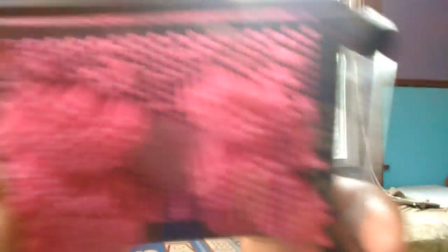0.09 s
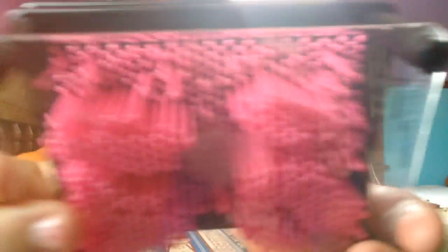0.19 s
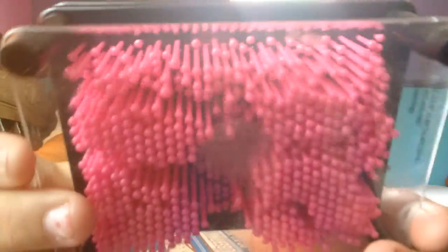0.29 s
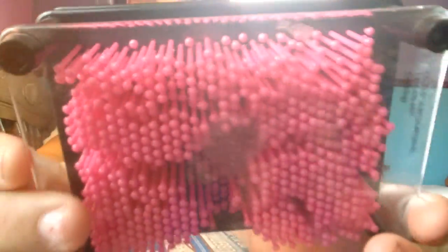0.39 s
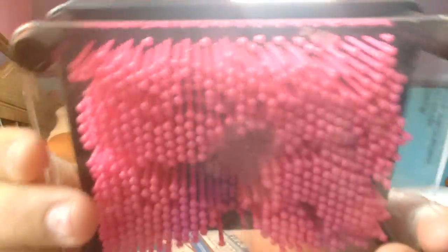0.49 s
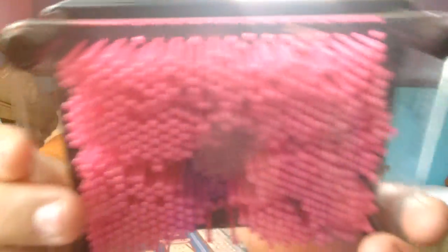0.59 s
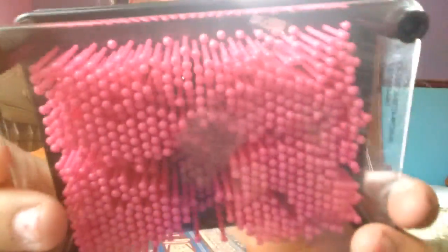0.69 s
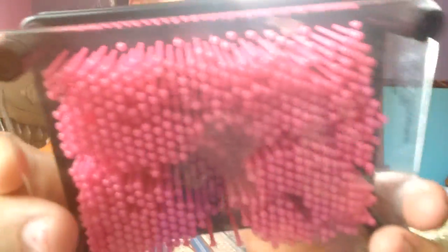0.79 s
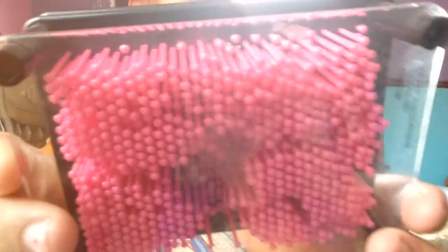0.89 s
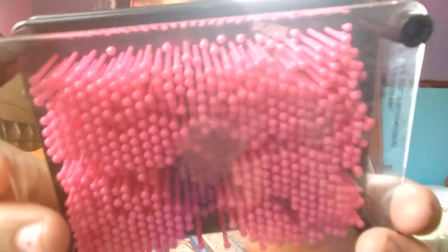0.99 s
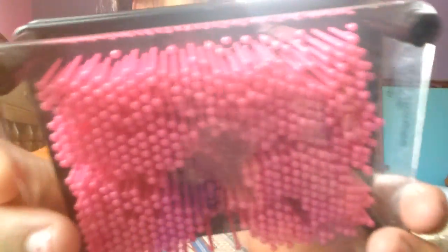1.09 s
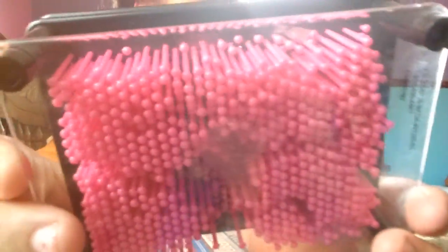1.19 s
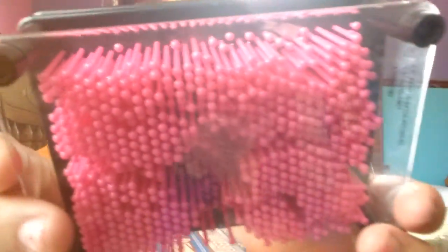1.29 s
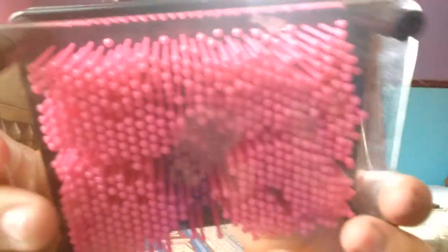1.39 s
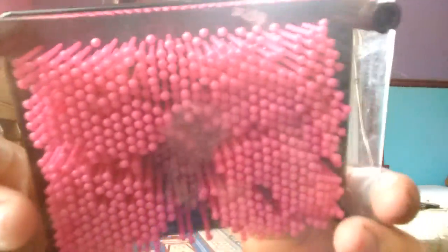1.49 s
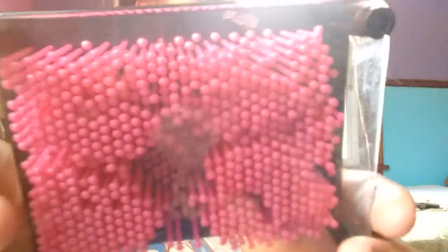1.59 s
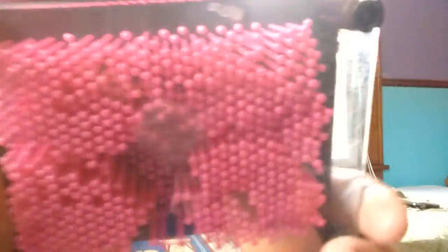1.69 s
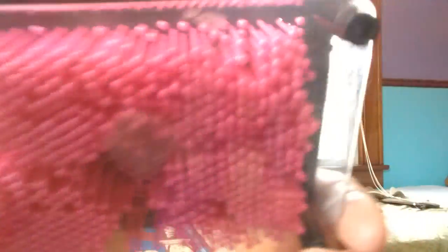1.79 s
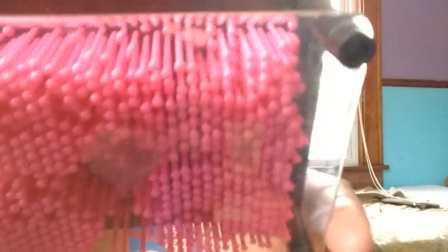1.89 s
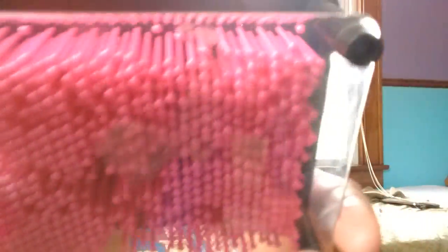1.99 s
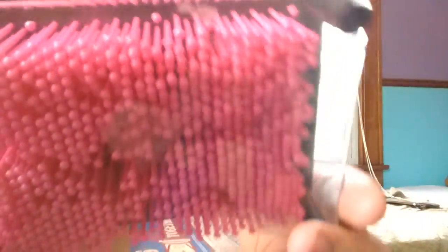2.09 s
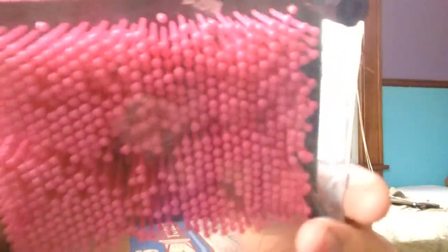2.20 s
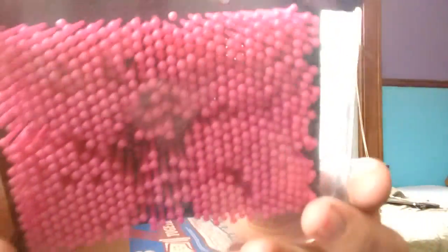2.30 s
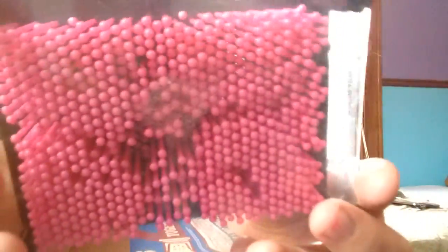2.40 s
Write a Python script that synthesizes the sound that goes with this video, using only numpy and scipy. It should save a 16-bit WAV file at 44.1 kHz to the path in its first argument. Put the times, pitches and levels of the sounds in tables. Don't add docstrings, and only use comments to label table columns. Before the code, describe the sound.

Loose plastic pins of a pin toy clatter in two quick bursts, sparse ticks between, close up

```python
import sys
import numpy as np
from scipy import signal
from scipy.fft import rfft, irfft
from scipy.io import wavfile

SR = 44100
rng = np.random.default_rng(int(sys.argv[2]) if len(sys.argv) > 2 else 0)


def store_pcm(level_fs):
    pcm = np.round(np.clip(level_fs, -1, 1) * 32767).astype(np.int16)
    wavfile.write(sys.argv[1], SR, np.atleast_2d(pcm).T)


def convert_level_to_amplitude(level_db):
    exponent = np.asarray(level_db, float) / 20
    return 10 ** exponent


N = 105840


def sharpen(hz, width):
    r = np.exp(-np.pi * width / SR)
    return r, [1, -2 * r * np.cos(2 * np.pi * hz / SR), r * r]


def resonate(x, peaks):
    click = np.arange(SR // 20) == 0
    out, unit = 0, 0
    for k, (hz, width, db) in enumerate(peaks):
        _, a = sharpen(hz, width)
        b = (-1) ** k * convert_level_to_amplitude(db) * np.array([1, 0, -1])
        out = out + signal.lfilter(b, a, x + 1e-18)
        unit = unit + signal.lfilter(b, a, click)
    return out / np.abs(unit).max()


def smooth(x, order, edge_hz, kind="low"):
    return signal.sosfilt(signal.butter(order, edge_hz, kind, fs=SR, output="sos"), x)


# start [s], port ring peak [dB], plate knock relative to it [dB].
FIRST_TILT = [(0.2402, -8, -7), (0.2423, -4, -12.5), (0.2457, -3, -12), (0.2467, -4.5, -7.5),
              (0.25, -7.5, -13.5), (0.251, -3.5, -13), (0.2543, -17, -9.5), (0.2568, -14.5, -7.5),
              (0.262, -15.5, -9), (0.2621, -10.5, -5), (0.2634, -16, -6.5), (0.2661, -8, -8),
              (0.268, -8, -9.5), (0.269, -16.5, -12.5), (0.272, -17, -10), (0.274, -15, -16),
              (0.276, -18, -6), (0.279, -20, -8.5), (0.282, -29, -9), (0.285, -8, -13), (0.291, -0.5, -19),
              (0.2922, -10.5, -8), (0.2948, -4, -18.5), (0.2987, -12.5, -9.0), (0.3016, -17, -14.5),
              (0.3031, -7.5, -12.5), (0.3082, -14.5, -17.5), (0.313, -21, -12), (0.3165, -10.5, -12.5),
              (0.3193, -20.5, -7.5), (0.3225, -7, -13.5), (0.3279, -26, -11.5), (0.33, -16, -13.5),
              (0.3316, -16.5, -14), (0.3343, -17, -9), (0.3359, -12.9, -13), (0.3382, -27.5, -7.5),
              (0.3437, -26, -11),
              (0.108, -30.5, -4), (0.1488, -30.5, -5), (0.152, -23, -10), (0.1543, -27, -13.5),
          (0.1664, -37.5, -15.5), (0.175, -37, -1), (0.1856, -34.5, -19.5), (0.1936, -21.5, -8),
          (0.196, -13, -17.5), (0.3474, -28, -13), (0.3507, -34, -2.5), (0.3555, -17, -11.5),
          (0.3582, -19.5, -1.3), (0.3576, -22.5, -0.5), (0.362, -8, -8.5), (0.3654, -29.5, -14.5),
          (0.3656, -30.5, -9.5), (0.3699, -32.5, -4), (0.3748, -8.5, -23.5), (0.3769, -13, -9),
          (0.3797, -3.5, -15), (0.3811, -2.5, -16.8), (0.3827, -10.5, -17.5), (0.385, -11.5, -9),
          (0.3873, -5, -13), (0.3901, -7.5, -6.5), (0.393, -3, -15), (0.3952, -8, -11), (0.3969, -8, -14.5),
          (0.3977, -17.5, -4), (0.4013, -19, -5), (0.406, -9, -6), (0.4083, -20, -2.1), (0.4107, -7, -10.5),
          (0.413, -21.5, -4.7), (0.4146, -9.5, -6.5), (0.4166, -24, -3.5), (0.4213, -20, -7),
          (0.4236, -16.5, -6.5), (0.4265, -15.0, -10), (0.4288, -26, -12), (0.4298, -24, -11),
          (0.4341, -26.5, -10.5), (0.4386, -26, -11), (0.4416, -30, -5), (0.4448, -32.5, -8),
          (0.4474, -21.5, -7.5), (0.4493, -20.5, -5), (0.4503, -29.6, -17)]
SECOND_TILT = [(2.0215, -8.5, -11), (2.0335, -10.5, -10), (2.0371, -16, -9), (2.0391, -24.5, -1),
               (2.046, -17, -3), (2.0476, -11, -23), (2.0493, -14.5, -7.5), (2.0512, -12, -22),
               (2.0531, -16.5, -3), (2.0565, -27, -11), (2.0619, -5.5, -13), (2.0645, -22, -4),
               (2.0716, -8.5, -6), (2.0733, -6.5, -27), (2.0754, -13.5, -3.5), (2.0795, -13, -8),
               (2.0811, -9.5, -11), (2.0828, -12.5, -12.5), (2.0857, -7.5, -6), (2.0883, -23, -4),
               (2.0915, -13, -6), (2.0933, -11, -11), (2.0945, -12, -16), (2.0969, -8, -8.5),
               (2.1002, -13.5, -2), (2.1024, -19.5, 0.5), (2.105, -17.5, -4.5), (2.1068, -9.5, -7),
               (2.1085, -17, -17), (2.1114, -26, -7), (2.1142, -15, -8.5), (2.117, -24, -11),
               (2.122, -29, -15.5), (2.1243, -31, -20), (2.1268, -41, -22), (2.1333, -16.5, -5.5),
               (2.1355, -17, -16), (2.1376, -20.5, 0.5), (2.1423, -15.5, -6.0), (2.1452, -23.2, -14.5),
               (2.1526, -36, -18), (2.154, -28.3, -25), (2.1614, -29, -20), (2.1652, -46, -29.5),
               (2.1734, -26, 5.5), (2.1826, -14, -9), (2.1851, -16, -16), (2.2015, -20.5, -0.7)]
# start [s], port ring peak [dB], plate knock
# relative to it [dB], group spread [ms].
LONE_SLAPS = [(0.4331, -19.5, -10, 2.4), (0.448, -29, -7, 3.7), (0.5376, -48.5, 12, 3.74),
              (0.5599, -43.5, 9.5, 1.46), (0.5806, -41, 12, 2.0), (0.6323, -26.5, -4, 2.5),
              (0.6644, -24, -12, 2.54), (0.6706, -16, -13, 2.37), (0.7178, -11, -8.5, 2.56),
              (0.7308, -42, -31, 2.8), (0.7994, -37.5, -25.5, 2.34), (0.831, -39.5, -22, 3),
              (1.055, -51.5, -22, 6.0), (1.1101, -20, -7, 2.57), (1.142, -22.5, -5, 3.37),
              (1.167, -28.5, -4, 3.48), (1.4504, -34, -7.5, 2.2), (1.5214, -31.5, -8, 2.92),
              (1.5822, -54.5, -32, 4.1), (1.5897, -45, -30, 1.8), (1.61, -52, -33.5, 2.5),
              (1.6322, -49.5, -41, 4.0), (1.6931, -54, -24.5, 3.4), (1.711, -56.5, -27, 3.3),
              (1.7927, -56.5, -25, 2.97), (1.8104, -60.5, -29, 2.3), (1.8264, -62, -29.5, 3.5),
              (1.874, -60.5, -12, 8.0),
              (0.6735, -20.0, -3, 1.5), (0.6765, -25.5, -6.5, 1.5), (0.7138, -21.5, -2.5, 1.5),
            (1.9096, -47.5, -1, 3.6), (1.9354, -41, -9, 3.5), (1.9435, -37.5, -0.5, 3.8),
            (1.9524, -39, 4, 3.2), (1.9609, -36, 0, 3.8), (1.9969, -20, -7, 3.2), (2.2942, -34.0, 2, 3.7),
            (2.3834, -38.5, -9.5, 1.2), (2.3848, -48, -3, 1.2), (2.3863, -33, 2, 1.2),
            (2.3891, -28, 1.5, 1.2), (2.3916, -24.5, 2.3, 1.2), (2.3945, -21, -1.5, 1.2),
            (2.3974, -15, -9, 2.5)]
SWELL = [
    (0.2856, -12.5, -5.5, 1.15),
    (0.2867, -13.5, -7.5, 1.56),
    (0.2889, -5, -12, 1.74),
    (0.3149, -11.5, -7.5, 1.1),
    (0.3728, -14.5, -7.5, 1.1),
]
# from [s], to [s], loss [dB].
BRUSHING = [
    (.09, .23, 4),
    (.23, .34, 6.5),
    (1.88, 2.01, 6),
    (2.01, 2.16, 2),
]
# pitch [Hz], width [Hz], level in the first tilt [dB], level later [dB].
PINS = [(5650, 240, -27, -23.5), (11200, 160, -18.5, -20), (14400, 350, -19.5, -32.5)]
# pitch [Hz], width [Hz], level [dB].
KNOCK = [(956, 1300, -11.5), (2400, 1900, -8.5), (3730, 2100, -7.5), (5670, 2200, -2)]
CRACK = (13000, 5000, 0)


def land_groups():
    rattle_spread_ms, port_hz = 1.2, 8189
    follower_loss_db, uneven_db = 0.5, 6
    groups = [(*row, rattle_spread_ms) for row in FIRST_TILT + SECOND_TILT]
    groups += [tuple(row) for row in LONE_SLAPS + SWELL]
    s, db, knock_db, spread_ms = np.transpose(groups)[:, :, None]
    draw = rng.random(size=(len(s), 4, 7))
    late = draw[:, 0] * (np.arange(7) > 0)
    at = np.clip((s + late * spread_ms / 1000) * SR, 0, N - 1).astype(int)
    share = convert_level_to_amplitude(-follower_loss_db * 2 * late + uneven_db * (2 * draw[:, 1] - 1))
    share = share * np.sign(draw[:, 2] - 0.5)
    phase = np.exp(2j * np.pi * port_hz * at / SR)
    in_step = np.abs(np.sum(share * phase, axis=1, keepdims=True))
    least = 0.7 * np.linalg.norm(share, axis=1, keepdims=True)
    size = convert_level_to_amplitude(db) * share / np.maximum(in_step, least)
    colour = 2 * draw[:, 3].T[:, :, None] - 1
    return s, db, knock_db, late * spread_ms, at, size, colour


def slaps():
    s, db, knock_db, late_ms, at, size, colour = land_groups()
    ring_db, knock_level_db = 4.5, 9.5
    crack_db, crack_per_db = -10.5, 0.15
    pin_uneven_db, knock_uneven_db = 4, 2
    knock_fade_db_per_ms, tilt_ends_s = 9.5, 0.46
    gains_db = [ring_db, crack_db + crack_per_db * db]
    for (_, _, first, later), c in zip(PINS, colour):
        gains_db.append(np.where(s < tilt_ends_s, first, later) + pin_uneven_db * c)
    for (_, _, mode_db), c in zip(KNOCK, colour[len(PINS):]):
        level_db = knock_db + knock_level_db + mode_db + knock_uneven_db * c
        gains_db.append(level_db - knock_fade_db_per_ms * late_ms)
    for start, end, loss_db in BRUSHING:
        low = -len(KNOCK)
        gains_db[low] = gains_db[low] - loss_db * ((s > start) & (s < end))
    trains = np.zeros((len(gains_db), N))
    for train, gain_db in zip(trains, gains_db):
        np.add.at(train, at, size * convert_level_to_amplitude(gain_db))
    return trains[0], trains[1:-len(KNOCK)], trains[-len(KNOCK):]


def tinkle(pins, ticks):
    modes = [CRACK] + [row[:3] for row in PINS]
    ringing = sum(resonate(train, [mode]) for train, mode in zip(pins, modes))
    ringing = ringing + convert_level_to_amplitude(-20) * resonate(ticks, [CRACK])
    return room(ringing, t60=0.21, level_db=-9, echo_db=-6)


def plate_knock(knocks, ticks):
    tick_db = -8
    modes = []
    for train, mode in zip(knocks, KNOCK):
        modes.append(resonate(train + convert_level_to_amplitude(tick_db + mode[2]) * ticks, [mode]))
    knock = modes[0] + smooth(sum(modes[1:]), 3, 1500, "high")
    return room(smooth(knock, 3, 7000), t60=0.25, level_db=-13.5, echo_db=-6)


# time [s], level [dB].
SHUFFLE = [
    (0.0, -49.5),
    (0.15, -36),
    (0.31, -13),
    (0.51, -27.5),
    (0.67, -59.5),
    (0.83, -66),
    (1.38, -82),
    (1.959, -74.5),
    (2.12, -38.5),
    (2.4, -48.5),
]


def shuffle():
    level_db, per_s, uneven_db = -18.5, 760, 3
    sizes = convert_level_to_amplitude(uneven_db * np.minimum(rng.exponential(1, N), 5)) * rng.choice([-1, 1], N)
    ticks = sizes * (rng.random(N) < per_s / SR)
    s, db = np.transpose(SHUFFLE)
    return convert_level_to_amplitude(np.interp(np.arange(N) / SR, s, db) + level_db) * ticks


# pitch [Hz], width [Hz], level [dB].
FRAME = [(474, 250, -3), (684, 770, 0)]


def box_frame(low_knock):
    return convert_level_to_amplitude(-23.5) * resonate(room(low_knock, t60=0.3, level_db=-4, echo_db=0), FRAME)


# pitch [Hz], width [Hz], lift [dB].
PORT = [(8224, 440, 7.5), (8030, 1300, 1)]


def port(x):
    both = np.stack([x + 1e-18, np.arange(N) == 0])
    both = smooth(both, 2, [5550, 10860], "band")
    both = smooth(both, 2, 11500)
    for hz, width, db in PORT:
        r, a = sharpen(hz, width)
        both = both + convert_level_to_amplitude(db) * (1 - r * r) / 2 * signal.lfilter([1, 0, -1], a, both)
    return both[0] / np.abs(both[1]).max()


def port_ring(clicks):
    ring = port(clicks)
    returned = room(ring, t60=0.21, level_db=-11.5, echo_db=0) - ring
    return ring + convert_level_to_amplitude(-15.5) * resonate(returned, [(8700, 1300, 0)])


# delay [ms], level [dB].
ECHOES = [
    (9.5, -17),
    (13.3, -15),
    (22.5, -21),
]


def room(x, t60, level_db, echo_db):
    onset_s = 0.0047
    t = np.arange(SR // 2) / SR
    tail = rng.standard_normal(len(t)) * convert_level_to_amplitude(-60 * t / t60) * (1 - np.exp(-t / onset_s))
    tail = convert_level_to_amplitude(level_db) * tail / np.sqrt(np.sum(tail ** 2))
    tail[0] = 1
    for ms, db in ECHOES:
        tail[int(ms * SR / 1000)] += convert_level_to_amplitude(db + echo_db)
    return signal.fftconvolve(x, tail)[:N]


# frequency [Hz], density [dB per Hz].
HUSH = [(30, -14), (60, -6), (150, -3), (300, -11.5), (570, -12.5), (1350, -24), (6000, -35), (7800, -56.5)]
# time [s], lift [dB].
HANDS = [
    (0, 3),
    (.37, 5),
    (.67, 6),
    (.89, 1),
    (1.45, 0.5),
    (1.91, -2),
    (2.16, 7.5),
    (2.4, 3),
]


def rms_one(x):
    return x / np.sqrt(np.mean(x ** 2) + 1e-20)


def hush():
    low_db, ring_db, hiss_db, rumble_cut_hz = -75, -81, -91, 20
    white = rng.standard_normal((3, N))
    hz = np.arange(N // 2 + 1) * SR / N
    at, db = np.transpose(HUSH)
    colour = convert_level_to_amplitude(np.interp(np.log(hz + 1), np.log(at), db))
    colour = colour / (1 + (rumble_cut_hz / (hz + 1)) ** 2)
    low = rms_one(irfft(rfft(white[0]) * colour, N))
    hands_db = np.interp(np.arange(N) / SR, *np.transpose(HANDS))
    ringing = convert_level_to_amplitude(ring_db) * rms_one(port(white[1]))
    return convert_level_to_amplitude(low_db + hands_db) * low + ringing + convert_level_to_amplitude(hiss_db) * white[2]


def scene():
    clicks, pins, knocks = slaps()
    ticks = shuffle()
    box = plate_knock(knocks, ticks) + box_frame(knocks[0])
    mix = port_ring(clicks + ticks) + tinkle(pins, ticks) + box + hush()
    return mix[None]


def top_cut(x):
    return signal.sosfilt(signal.butter(12, 16300, fs=SR, output="sos"), x)


def record(dry):
    ceiling, cutoff_hz, offset = 0.9, 16500, -0.0005
    rounded = ceiling * np.tanh(dry / ceiling)
    cut = signal.sosfilt(signal.cheby2(10, 60, cutoff_hz, fs=SR, output="sos"), rounded)
    return top_cut(cut + offset)


dry = scene()
out = record(dry)
store_pcm(out)
```